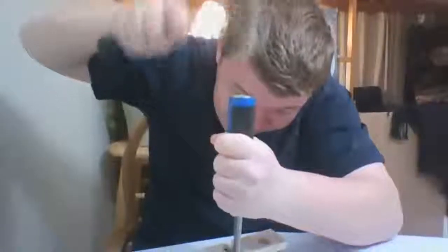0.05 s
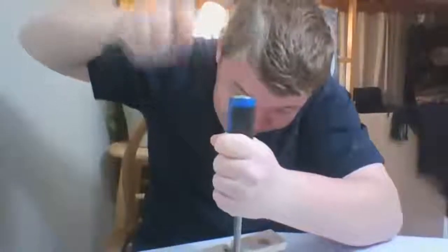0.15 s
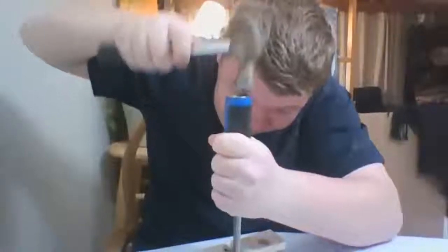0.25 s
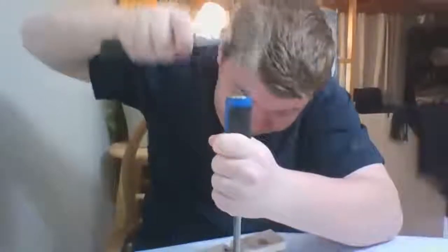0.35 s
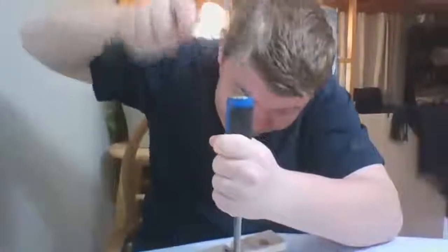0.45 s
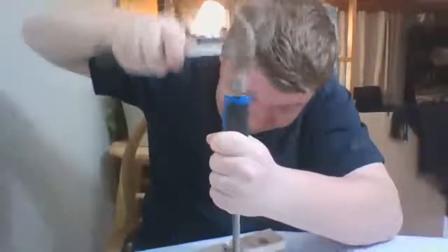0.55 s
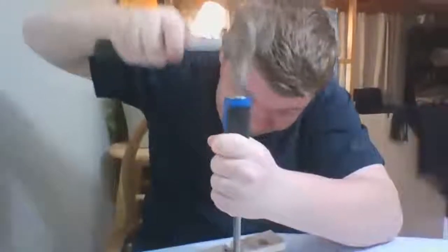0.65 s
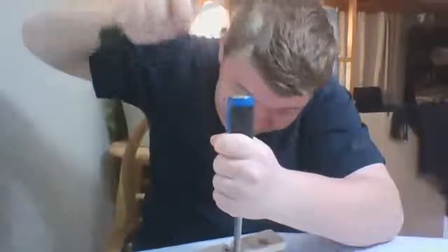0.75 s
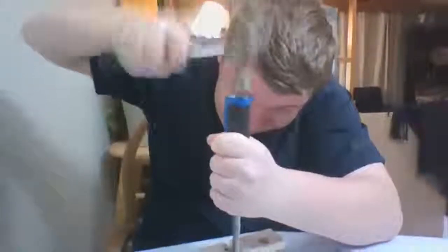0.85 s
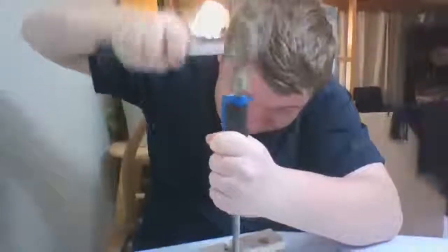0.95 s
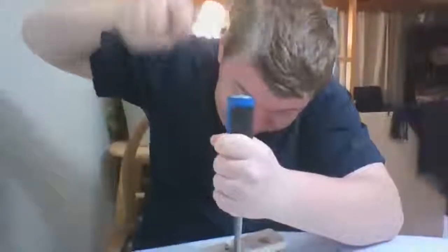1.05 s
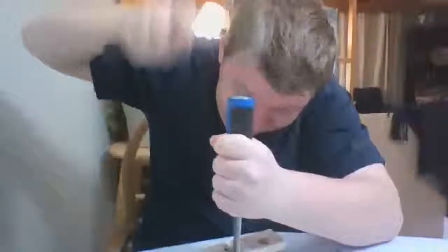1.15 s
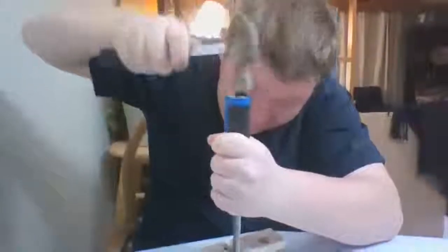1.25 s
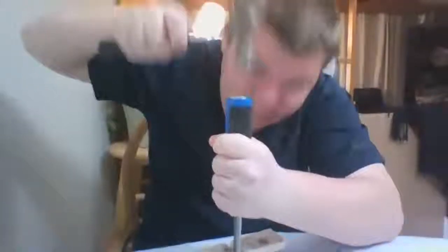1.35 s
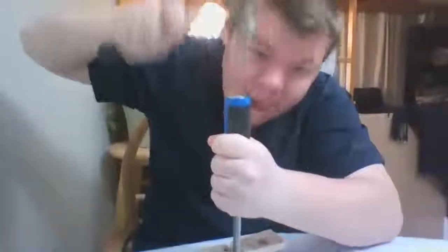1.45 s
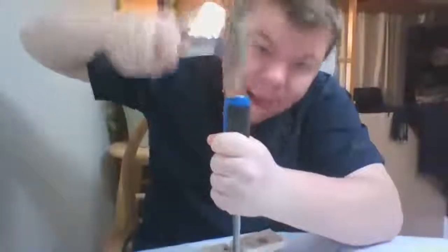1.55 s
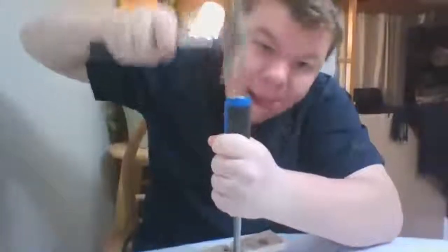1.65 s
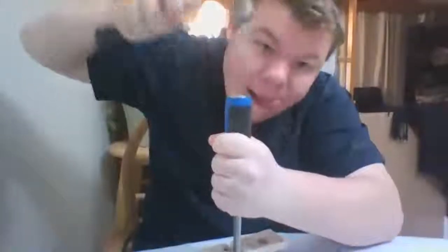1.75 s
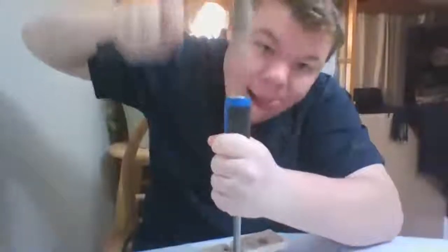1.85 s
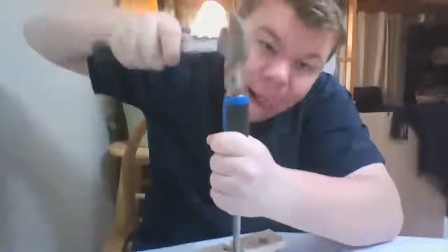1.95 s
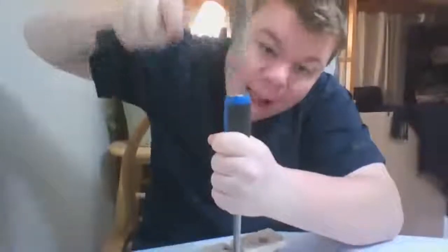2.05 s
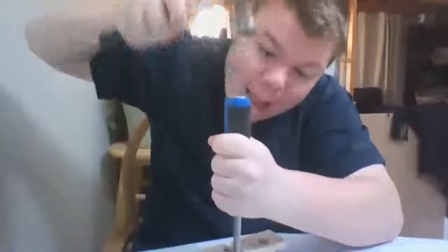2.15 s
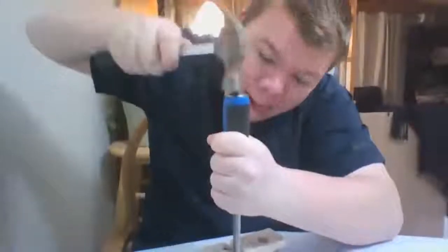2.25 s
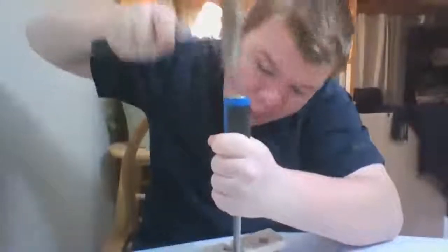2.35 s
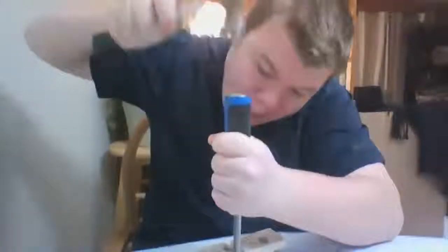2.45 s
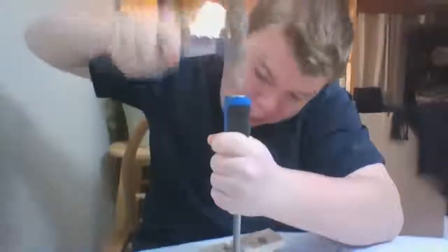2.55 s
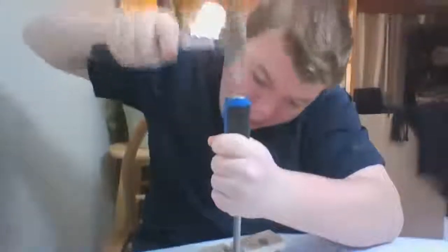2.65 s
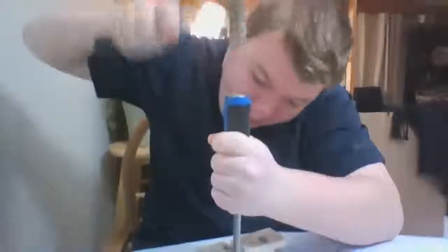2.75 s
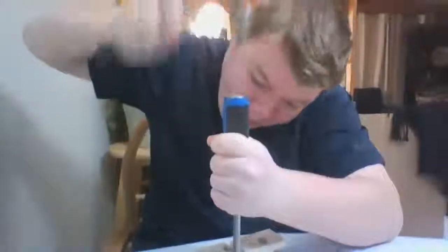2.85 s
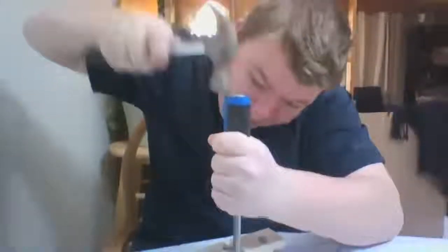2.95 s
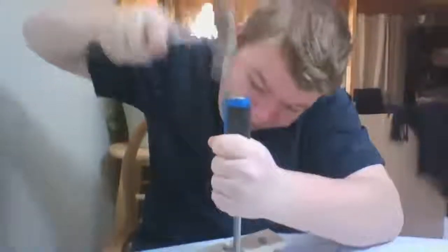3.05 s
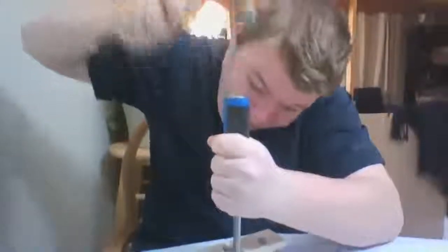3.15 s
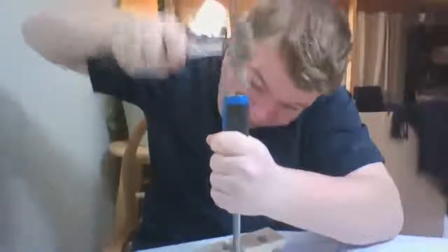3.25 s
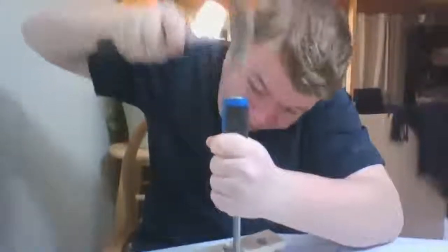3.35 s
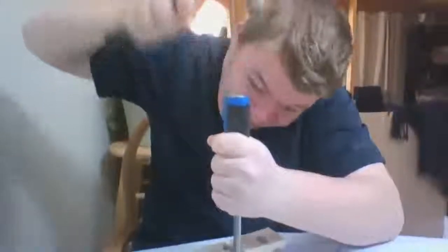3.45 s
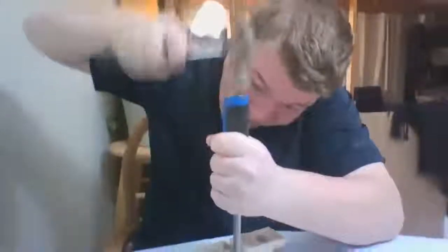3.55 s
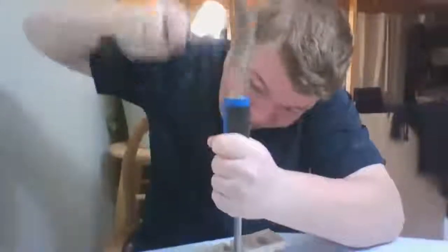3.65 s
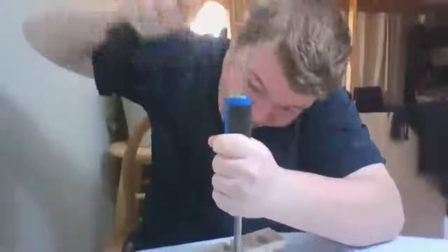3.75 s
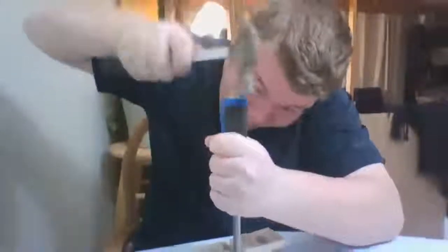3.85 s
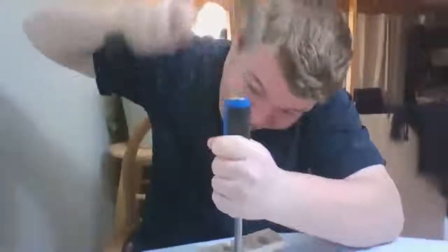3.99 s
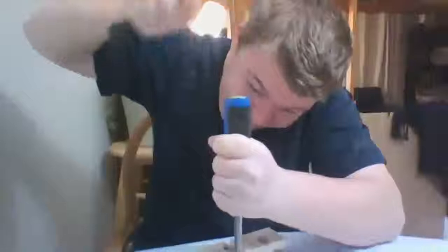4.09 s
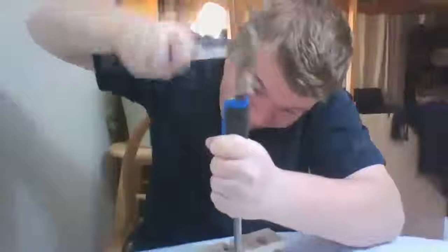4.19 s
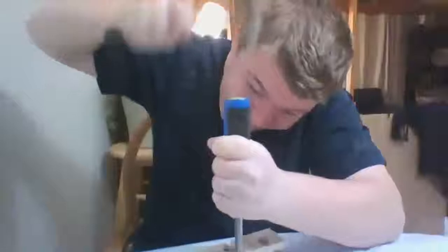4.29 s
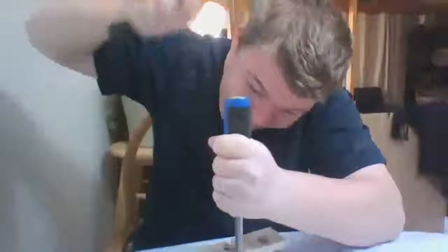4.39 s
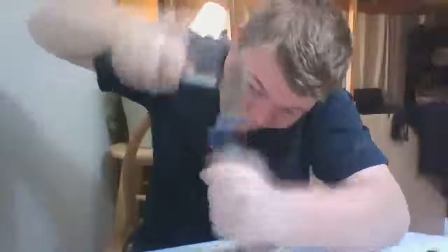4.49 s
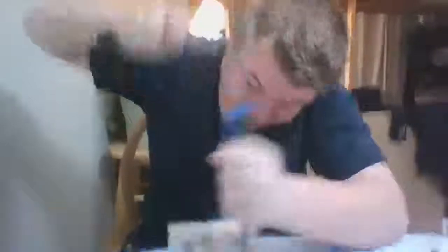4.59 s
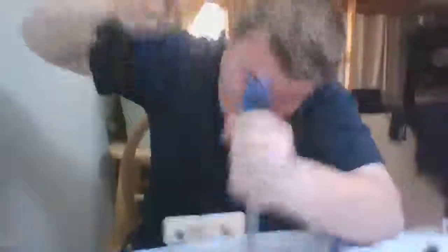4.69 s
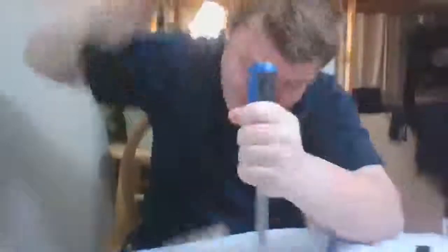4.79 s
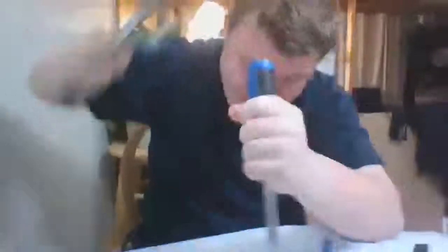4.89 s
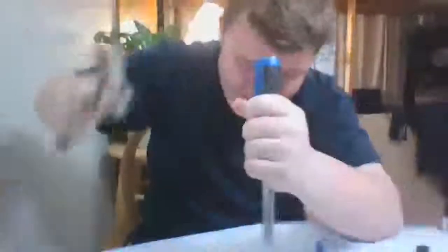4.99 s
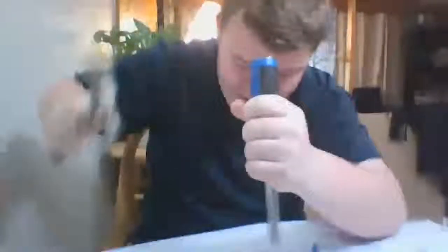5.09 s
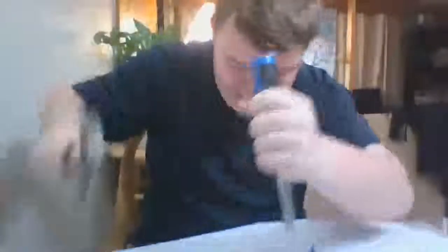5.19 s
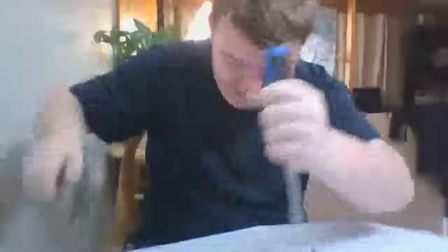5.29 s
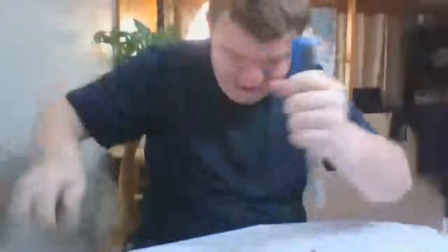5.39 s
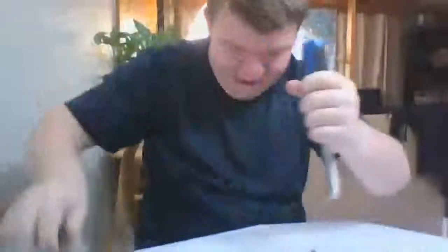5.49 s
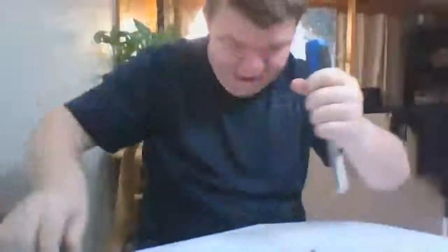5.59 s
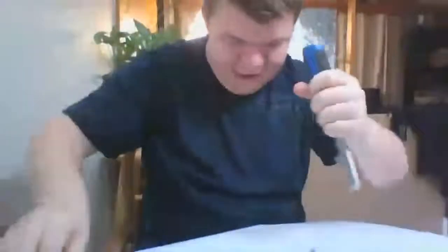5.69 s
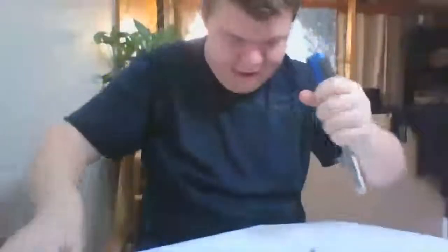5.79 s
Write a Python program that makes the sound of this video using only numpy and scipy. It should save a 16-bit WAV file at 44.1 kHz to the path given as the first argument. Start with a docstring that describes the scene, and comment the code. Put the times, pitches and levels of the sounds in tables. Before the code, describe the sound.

Loud, close, slightly overloaded hammer cracks with a steel ring, three a second, ending in a wooden tumble, gritty scrapes and faint knocks.

```python
"""In a live room, a small wooden block stands on a table, with the microphone close by.
A steel hammer drives a chisel into it, three blows a second: noise bursts crack the wood and fill the room,
decaying sines boom the table and ring the blade. The last blow kicks the block over; it clatters away as knocks
of filtered noise. Gritty noise strokes drag the tools aside, soft hisses follow sleeve and arm, and knocks
put the tools down. The microphone gates the tails and overloads on the blows."""
import sys
import numpy as np
from scipy import signal
from scipy.fft import rfft, irfft, next_fast_len
from scipy.io import wavfile
from scipy.ndimage import uniform_filter1d, minimum_filter1d

SR = 44100
rng = np.random.default_rng(int(sys.argv[2]) if len(sys.argv) > 2 else 0)


def log_audio(samples):
    """Write samples as a 16-bit WAV file to the path given in sys.argv[1]."""
    # one column per channel
    frames = np.atleast_2d(samples).T
    # limit to full scale, then quantise
    limited = np.clip(frames, -1, 1)
    pcm = np.round(limited * 32767).astype(np.int16)
    wavfile.write(sys.argv[1], SR, pcm)


N = 257103

# Hammer blows. Each row: start in seconds, force in dB, steel ring relative to the force in dB.
HAMMER_BLOWS = [(-.055, 1, -10), (0.2718, 1.54, -3.5), (0.5947, 1.5, -4), (0.9419, 3, 2), (1.2902, 0, -1.5),
                (1.6189, -2, -8.5), (1.959, 2.4, -2), (2.3042, 0.5, -1), (2.6461, 0.5, -7.5),
                (2.982, 2.6, -1), (3.3072, 2.36, 1.5), (3.6084, 1.75, 1), (3.9322, 1.3, 3), (4.2429, 0, 5),
                (4.5624, -10, -3)]
# Table and block, the same modes for every blow and knock. Each row: frequency in Hz, relative level in dB,
# 60 dB decay time in seconds.
TABLE_MODES = [(138.96, -14, 0.39), (123.1, -27, .5), (159, -30.5, 0.57), (244.1, -24.5, 0.37),
               (298.85, -20, 0.3), (432, -23, .25), (529, -20.5, 0.15), (621, -17, 0.14), (714, -20.5, .22),
               (843.3, -14, 0.14), (1060, -19, 0.14), (1102, -25.5, .4), (1202, -25, 0.36),
               (1287, -19, 0.17), (1354, -18.5, 0.19), (1624, -24.5, 0.39), (2075, -26, 0.18),
               (2395, -26, 0.38), (2470, -29, 0.33), (2536, -23, 0.16), (2690, -26, 0.23),
               (3055, -25.5, .27), (3200, -25, .24)]
# Steel of chisel and hammer, before the wood damps it. Each row: frequency in Hz, relative level in dB,
# 60 dB decay time in seconds.
STEEL_MODES = [(4165, -41, .7), (4850, -46, .65), (5640, -36, .75), (5662, -38, .7), (6131, -41, .65),
               (6443, -46, .65), (6686, -54, 4), (7353, -56, 1.8), (7601, -45, .65), (7854, -52, .6),
               (8179, -51, .6), (8400, -49, .65), (8952, -44, .65), (10088, -51, .65)]
# Burst of splitting wood. Each row: band centre in Hz, band gain in dB, 60 dB decay time in seconds.
CRACK_BANDS = [(50, -37.5, .12), (157, -16, 0.058), (406, 3, 0.13), (900, 7.5, 0.044), (1300, 11.5, 0.03),
               (1860, 2, 0.06), (3070, 2.5, 0.044), (5100, 2.5, 0.02), (7900, -4.5, 0.022),
               (15000, -11.5, 0.024)]
# Reverberation of the room. Each row: band centre in Hz, band gain in dB, 60 dB decay time in seconds.
ROOM_BANDS = [(40, -14.5, 0.22), (93.5, -13, 0.34), (270, -2, 0.36), (577, -4, 0.4), (1450, -4, 0.5),
              (1860, -7, 0.48), (3140, -10, 0.45), (3785, -16, 0.45), (5700, -20, 0.42), (11000, -30, 0.26),
              (15000, -38, 0.48)]
# The block tumbles, the tools touch down. Each row: start in seconds, relative level in dB, centre in Hz,
# 60 dB decay time in seconds.
TUMBLE_KNOCKS = [(4.5515, -13.5, 910, 0.13), (4.5646, -9.5, 4300, 0.045), (4.568, 5, 666, 0.054),
                 (4.598, 4, 1640, 0.02), (4.608, -11, 1100, 0.017), (4.621, -3.5, 1550, .024),
                 (4.667, -12, 1390, 0.018), (4.692, -7, 590, 0.024), (4.728, -9, 850, 0.045),
                 (4.832, -23, 440, 0.12), (5.243, -23.5, 3300, .025), (5.302, -17.5, 468, 0.082),
                 (5.443, -38, 1364, 0.096), (5.535, -36, 5240, 0.079), (5.7, -37, 2450, 0.1)]
# Steel dragged over the table top. Each row: time of the peak in seconds, rise scale in seconds, peak level in dB.
DRAG_STROKES = [(4.798, 0.018, -32), (4.967, 0.0056, -29.5), (5.144, 0.013, -25.5)]
# Spectrum of the dragged steel. Each row: frequency in Hz, relative level in dB.
DRAG_SPECTRUM = [(120, -58), (200, -37), (836, -26), (1350, -22), (1480, -19), (1650, -19.5), (2330, -13),
                 (2650, -12.5), (5840, -21.5), (16000, -54)]
# Strokes of sleeve and arm sliding. Each row: start in seconds, length in seconds, level in dB.
SLEEVE_STROKES = [(4.57, 0.26, -36.5), (5.093, 0.33, -46), (5.538, 0.083, -61), (5.705, .12, -53.5)]
# Spectrum of sleeve and arm. Each row: frequency in Hz, relative level in dB.
SLEEVE_SPECTRUM = [(200, -5.5), (800, -18), (2500, -4), (5500, 4.5), (8000, -5.5), (11000, -3.5),
                   (15500, -11.5)]
# Spectrum of the still room. Each row: frequency in Hz, relative level in dB.
HUSH_SPECTRUM = [(30, -14), (130, 8), (300, 12.5), (700, 1.5), (2500, -12.5), (6000, -20.5), (15000, -35.5)]

TIME = np.arange(N) / SR  # seconds
AGE = np.arange(SR) / SR  # one second of ringing
CUT_HZ, CUT_HZ_PER_BLOW = 3050, -39.5  # resonance of the blade in the cut: it falls as the blade sinks
CUT_DB, GRIP_DB, GRIP_POWER = 5, 8, 6  # it stands out most near the bottom of the cut, where the wood grips hard
STEEL_DAMPING_DB_PER_S = 2.9  # added to the steel's decay with every blow, as more wood holds the blade
TREBLE_DB, TREBLE_DB_PER_BLOW = -3.5, 0.358  # a firmer seat gives a brighter crack
THUMP_DB = 2.75  # the table takes the same push however softly the wood cracks
SCRAPE_FALL = 1.66  # fall scale over rise scale
SLIDE_ATTACK_S, SLIDE_RELEASE_DB_PER_S = 0.02, 83
TOP_HZ = 15800  # upper end of the microphone's range


def undb(db):
    """Decibels to gain."""
    return 10 ** (np.asarray(db) / 20)


def add(track, s, sound):
    """Mix a sound in from s seconds on, trimmed to the track."""
    start = int(round(s * SR))
    part = sound[max(-start, 0):N - start]
    begin = max(start, 0)
    track[begin:begin + len(part)] += part


def fade(t60):
    """Fall of 60 dB in t60 seconds."""
    return np.exp(-np.log(1000) * AGE / t60)


def band(x, hz, width_hz):
    """One resonance, gain 1 at its centre."""
    w = 2 * np.pi * hz / SR
    a = np.sin(w) * width_hz / hz / 2
    return signal.lfilter([a, 0, -a], [1 + a, -2 * np.cos(w), 1 - a], x)


def boost(x, db, hz, width_hz):
    """What a resonance adds to a sound when it lifts its centre by db; a negative db takes away."""
    return (undb(db) - 1) * band(x, hz, width_hz)


def colour(x, hz, gain):
    """Filter by gains joined on a log-frequency axis."""
    size = next_fast_len(len(x))
    f = np.maximum(np.fft.rfftfreq(size, 1 / SR), 1)
    return irfft(rfft(x, size) * gain(np.log(f), np.log(hz)), size)[:len(x)]


def tinted(x, points):
    """Give noise a spectrum of (Hz, dB) points and rms 1."""
    hz, db = np.transpose(points)
    y = colour(x, hz, lambda f, at: undb(np.interp(f, at, db)))
    return y / np.std(y)


def wash(noise, rows):
    """Countless overlapping modes: each band of the noise dies at its own rate."""
    hz, db, t60 = np.transpose(rows)
    total = np.zeros(len(noise))
    for pick, band_db, band_t60 in zip(np.eye(len(hz)), db, t60):
        # full gain at this centre, none at its neighbours
        one_band = colour(noise, hz, lambda f, at: np.interp(f, at, pick))
        total += one_band * undb(band_db) * fade(band_t60)
    return total


def modes(rows):
    """One decaying sine per mode, each reaching the microphone in its own phase."""
    ringing = []
    for hz, db, t60 in rows:
        swing = np.sin(2 * np.pi * (hz * AGE + rng.random()))
        ringing.append(undb(db) * fade(t60) * swing)
    return np.array(ringing)


def struck(ringing, scatter_db):
    """Every blow lands a little differently and weights the modes anew."""
    return undb(scatter_db * rng.standard_normal(len(ringing))) @ ringing


def hammering(room, alike=0.68, touch_db=-22, touch_s=0.0024, build_s=0.003, table_db=-2.5, steel_db=-1.5):
    """Blows into the block: a light touch as the blade seats, then crack, table boom, steel ring and room."""
    out = np.zeros(N)
    table = modes(TABLE_MODES)
    crack = wash(rng.standard_normal(SR), CRACK_BANDS)
    build = 1 - np.exp(-AGE / build_s)  # table and room take a moment to get going
    for depth, (s, force_db, ring_db) in enumerate(HAMMER_BLOWS):
        # the paths to the microphone stay the same, the splitting fibres do not
        own_crack = wash(rng.standard_normal(SR), CRACK_BANDS)
        own_room = wash(rng.standard_normal(SR), ROOM_BANDS)
        shared_part = crack + build * room
        own_part = own_crack + build * own_room
        hit = np.sqrt(alike) * shared_part + np.sqrt(1 - alike) * own_part
        hit = hit + build * undb(table_db) * struck(table, scatter_db=1.6)

        # every blow drives the blade one step deeper
        cut_hz = CUT_HZ + CUT_HZ_PER_BLOW * depth
        cut_db = CUT_DB + GRIP_DB * (depth / (len(HAMMER_BLOWS) - 1)) ** GRIP_POWER
        treble_db = TREBLE_DB + TREBLE_DB_PER_BLOW * depth
        hit = hit + boost(hit, cut_db, cut_hz, 470)
        thump = boost(hit, THUMP_DB - force_db, 200, 350)  # offsets the force applied below
        hit = hit + thump + boost(hit, treble_db, 9000, 12000)

        damping_db = STEEL_DAMPING_DB_PER_S * depth * AGE
        steel = struck(modes(STEEL_MODES), scatter_db=4.0)
        hit = hit + undb(steel_db + ring_db - damping_db) * steel
        add(out, s, undb(force_db) * hit)
        add(out, s - touch_s, undb(force_db + touch_db) * own_crack)
    return out


def knocking(table_db=-42):
    """Short damped noise knocks of wood and tools; each sets the table ringing a little."""
    out = np.zeros(N)
    for s, db, hz, t60 in TUMBLE_KNOCKS:
        burst = rng.standard_normal(SR) * fade(t60)
        # two passes of a resonance as wide as its centre frequency
        knock = band(band(burst, hz, hz), hz, hz)
        add(out, s, 2 * undb(db) * knock)
    table = modes(TABLE_MODES).sum(axis=0)
    return out + undb(table_db) * signal.fftconvolve(out, table)[:N]


def scraping(grain_db=4):
    """Steel catches and slips on the table top in short gritty strokes."""
    pressure = np.zeros(N)
    for s, rise, db in DRAG_STROKES:
        flank = np.where(TIME < s, rise, SCRAPE_FALL * rise)
        pressure += undb(db) * np.exp(-np.abs((TIME - s) / flank) ** 1.4 / 2)
    grit = rng.standard_normal(N) * undb(grain_db * rng.standard_normal(N))
    return pressure * tinted(grit, DRAG_SPECTRUM)


def sliding(flutter_db=2, flutter_hz=70):
    """Cloth and skin rub along with an uneven hiss: each stroke starts, holds and dies away."""
    steps = rng.standard_normal(N)
    flutter = np.interp(TIME * flutter_hz, np.arange(N), steps)
    speed = np.zeros(N)
    for s, length, db in SLEEVE_STROKES:
        attack = np.clip((TIME - s) / SLIDE_ATTACK_S, 0, 1)
        release_db = SLIDE_RELEASE_DB_PER_S * np.maximum(TIME - s - length, 0)
        speed += attack * undb(db - release_db)
    return speed * undb(flutter_db * flutter) * tinted(rng.standard_normal(N), SLEEVE_SPECTRUM)


def still_room(hush_db=-62):
    """Steady coloured noise: the hush of the room behind everything."""
    return undb(hush_db) * tinted(rng.standard_normal(N), HUSH_SPECTRUM)


def scene(wet_db=-30):
    """Hammering, then the handling noises, in one room."""
    room = wash(rng.standard_normal(SR), ROOM_BANDS)
    handling = knocking() + scraping()
    echo = undb(wet_db) * signal.fftconvolve(handling, room)[:N]
    return (hammering(room) + handling + echo + sliding() + still_room())[None]


def gate(x, open_db=-35, slope=0.99, depth_db=12, size=1100, order=14000):
    """Noise suppressor: a tail that has sunk far below the last loud moment is pushed further down."""
    # both windows, in samples, look back only
    power = uniform_filter1d(x ** 2, size, origin=(size - 1) // 2)
    level_db = 10 * np.log10(np.abs(power) + 1e-12)
    loudest_db = -minimum_filter1d(-level_db, order, origin=(order - 1) // 2)
    threshold_db = np.minimum(open_db, loudest_db - 16.0)
    return x * undb(-np.clip(slope * (threshold_db - level_db), 0, depth_db))


def record(dry, ceiling=0.68, knee=4, low_cut_hz=50):
    """The microphone gates the tails, flattens the loudest swings and cuts both ends of the range."""
    x = gate(dry[0])
    x = x / (1 + np.abs(x / ceiling) ** knee) ** (1 / knee)
    low_cut = signal.butter(2, low_cut_hz, "high", fs=SR, output="sos")
    high_cut = signal.ellip(10, .2, 80, TOP_HZ, fs=SR, output="sos")
    return signal.sosfilt(high_cut, signal.sosfilt(low_cut, x))[None]


dry = scene()
out = record(dry)
log_audio(out)
```